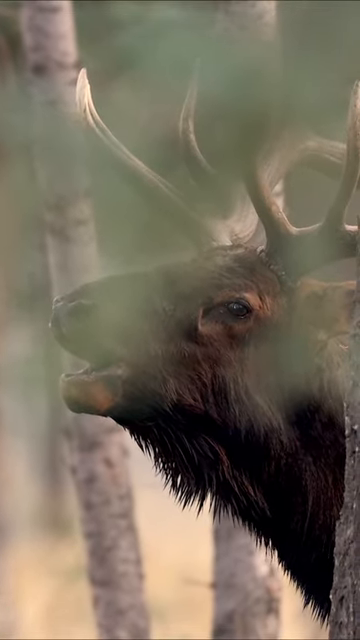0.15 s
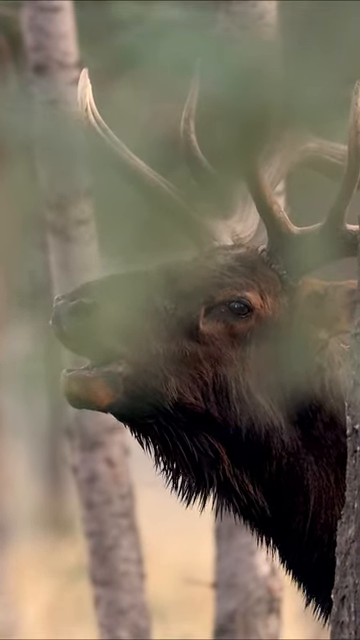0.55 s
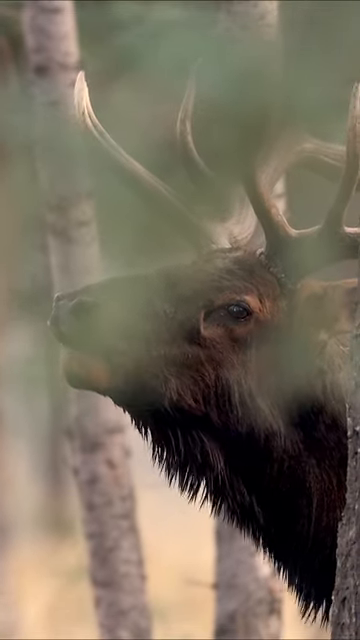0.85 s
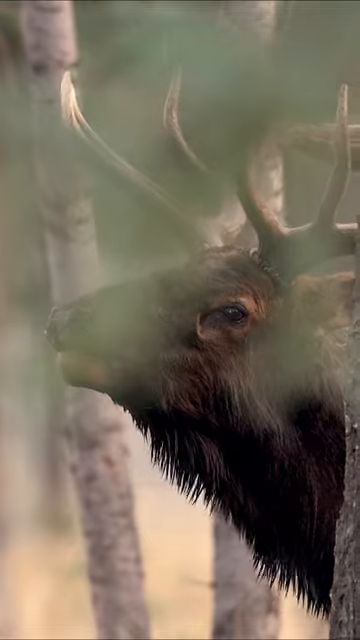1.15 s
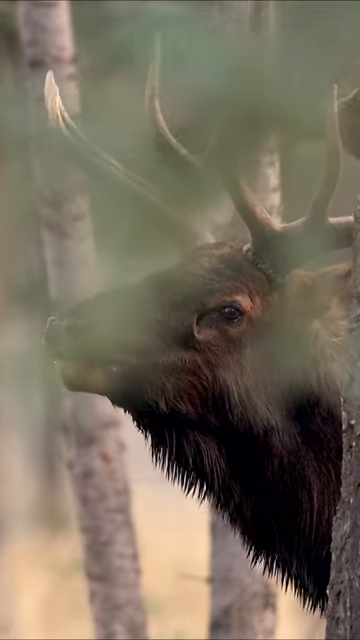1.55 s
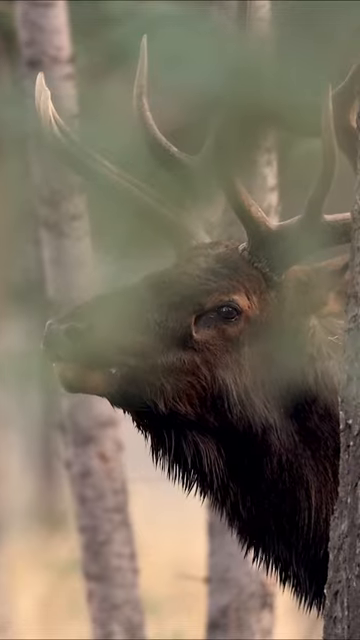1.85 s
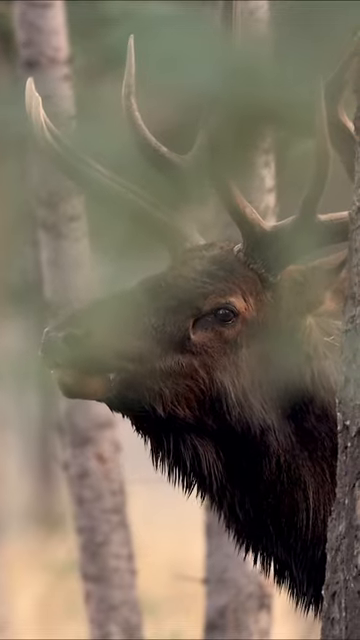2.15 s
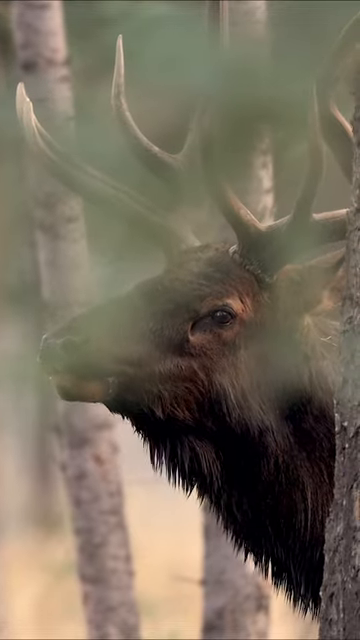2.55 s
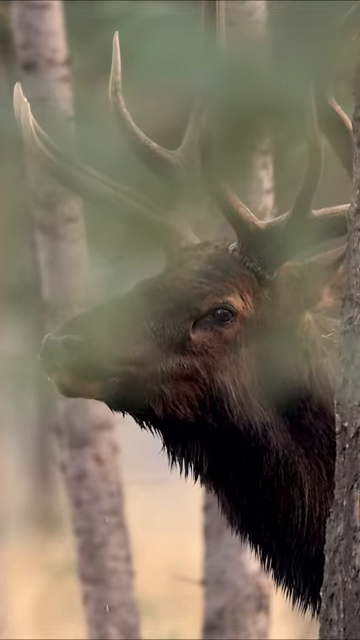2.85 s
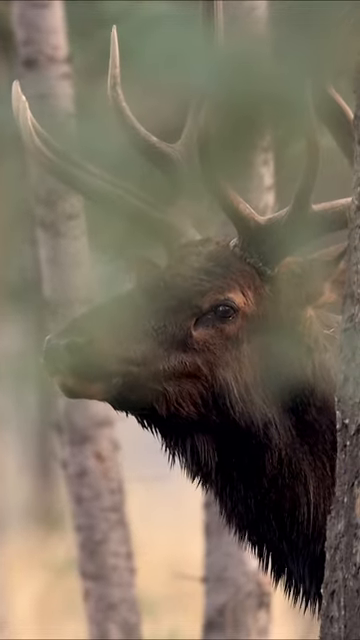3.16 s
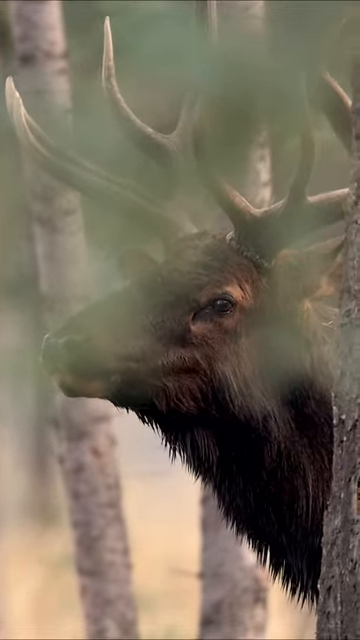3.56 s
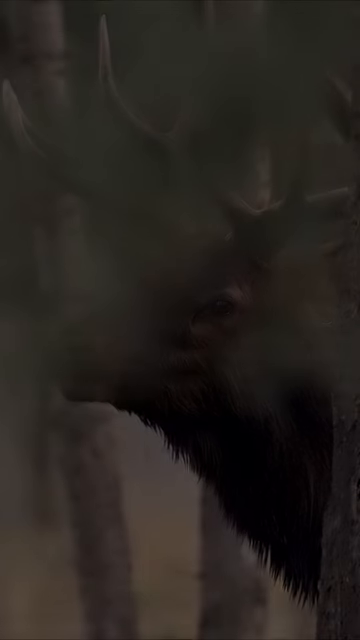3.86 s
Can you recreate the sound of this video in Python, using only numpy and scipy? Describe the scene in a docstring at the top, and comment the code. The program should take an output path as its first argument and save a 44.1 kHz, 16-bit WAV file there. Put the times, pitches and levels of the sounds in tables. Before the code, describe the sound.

Tail of an elk bugle falls fast from shrill whistle to low, with a rough throb, then echoes fade over soft wind. Later a much quieter, farther elk whistles up and breaks into a raspy, pulsing scream outdoors.

```python
"""Two bull elk bugling

A near bull ends its bugle: an air-jet whistle falls, its vocal folds drone, throb it and rasp underneath.
A farther bull answers: its whistle climbs in steps, then fold pulses ring its throat in a rough scream.
Trunks and valley echo the calls, over filtered-noise wind, wavering low tones and microphone hiss."""
import sys
import numpy as np
from scipy import signal
from scipy.fft import rfft, irfft
from scipy.io import wavfile
from scipy.ndimage import uniform_filter1d

SR = 44100
rng = np.random.default_rng(int(sys.argv[2]) if len(sys.argv) > 2 else 0)


def gain_from_decibels(decibels):
    """Convert decibel values to linear amplitude factors."""
    exponent = np.asarray(decibels, float) / 20
    return 10 ** exponent


def dump(signal):
    """Clip the signal to [-1, 1] and save it as 16-bit WAV at the path in sys.argv[1]."""
    limited = np.clip(np.atleast_2d(signal).T, -1, 1)
    pcm = np.round(limited * 32767).astype(np.int16)
    wavfile.write(sys.argv[1], SR, pcm)


N = 176400

# Near bull's whistle: (time [s], whistle pitch [Hz], whistle level [dB], lower sideband [dB],
# upper sideband [dB], octave [dB]); the last three are relative to the whistle
NEAR_WHISTLE = [(0, 1660, -34, -8, -1, -35), (.022, 1580, -35, -10, 3, -35),
                (.045, 1480, -52, -10, 11, -35), (.06, 1370, -44, -1, -4, -30),
                (.08, 1285, -36, -2, -10, -40), (.1, 1212, -31, -6, -13, -32),
                (.14, 1163, -29, -7, -15, -24), (.16, 1118, -27, -3, -19, -23),
                (.18, 1060, -27, -3, -16, -30), (.2, 1021, -26, -6, -15, -38),
                (.24, 970, -22, -7, -21, -36), (.26, 945, -21, -17, -24, -32),
                (.28, 865, -20, -22, -30, -28), (.299, 835, -18, -25, -30, -35),
                (.305, 790, -30, -25, -30, -35), (.326, 650, -30, -14, -20, -22),
                (.345, 615, -29, -12, -20, -26), (.349, 440, -41, -30, -30, -25),
                (.368, 200, -43, -30, -30, -25), (.378, 150, -75, -30, -30, -25)]
# Near bull's vocal folds: (time [s], pitch [Hz], first partial level [dB], second partial level [dB])
NEAR_FOLDS = [(0, 155.5, -27.5, -39), (.08, 144.2, -32.5, -54), (.14, 143.2, -34, -46),
              (.18, 138.3, -47, -40), (.24, 134.5, -42.5, -37), (.27, 132, -63, -36), (.3, 133, -59, -52),
              (.33, 131, -53.5, -78.5)]
# Far bull's whistle: (time [s], whistle pitch [Hz], whistle level [dB], lower sideband [dB],
# upper sideband [dB], octave [dB]); the last three are relative to the whistle
FAR_WHISTLE = [(2.66, 851, -79, -59, -22, -2), (2.71, 882, -56.5, -25, -46, -20),
               (2.765, 970, -54, -44, -32, -26), (2.79, 1050, -74, -29, -49, -22),
               (2.822, 1440, -57, -40, -40, -25), (2.847, 1480, -52, -40, -40, -25),
               (2.853, 1740, -56, -40, -40, -30), (2.885, 1795, -49, -40, -40, -35),
               (2.895, 1960, -74, -40, -40, -12), (2.916, 2010, -62, -40, -40, -8),
               (2.942, 2046, -55, -40, -40, -19), (2.975, 2036, -53, -40, -40, -21),
               (3.0, 2028, -52, -40, -40, -13), (3.05, 2042, -51, -40, -30, -8),
               (3.07, 2048, -59, -20, -25, -8), (3.085, 2045, -60, -6, -12, -11),
               (3.102, 2028, -61, -6, -5, 0), (3.13, 2023, -62, -6, -4, 4), (3.166, 2021, -62, -6, -6, 0),
               (3.182, 2022, -64, -6, -8, -9), (3.215, 2020, -60, -3, -15, -3),
               (3.27, 2022, -67, -3, -15, -6), (3.45, 2010, -74, -6, -13, -4)]
# Far bull's scream: (time [s], fold pulse rate [Hz], level [dB], deep resonances [dB],
# upper resonances [dB], top resonances [dB]); the last three are relative to the main resonances
FAR_SCREAM = [(3.16, 93, -57, -27, -5, -35), (3.178, 92.3, -39.5, -19, -14.5, -30),
              (3.23, 92, -38, -25, -13, -31), (3.255, 92, -40.5, -34, -12, -38),
              (3.28, 91.25, -38, -30, -6, -35.5), (3.35, 84.98, -36, -33, -11.5, -33.5),
              (3.5, 84, -36.5, -22, -11, -36), (3.55, 83.82, -42.5, -33, -4, -25.5),
              (3.61, 84.63, -37.5, -29, -7.5, -32), (3.69, 87.07, -41, -23, -2.5, -27),
              (3.74, 88.26, -48, -6, 5, -23), (3.79, 88.5, -42.5, -13, -6, -27.5),
              (3.88, 91.7, -45.5, -2.5, -1, -24), (4, 93.45, -43, -22, -3, -27)]
# Near bull's rough voice: (time [s], fold pulse rate [Hz], level [dB], deep resonances [dB],
# upper resonances [dB], top resonances [dB]); the last three are relative to the main resonances
NEAR_SCREAM = [(0, 150.7, -32.5, -8, -4, -36), (.06, 149.6, -42, -0.5, -10, -30),
               (.12, 146.6, -51.5, 4.5, 7.5, -23), (.25, 134, -57, 9.5, 0.5, -17.5),
               (.33, 130.5, -57, 8, 2, -22.5), (.37, 136.3, -82, 1.5, 8, -12)]
# Resonances of the long throat and nose, in four groups (deep, main, upper, top):
# (centre [Hz], width [Hz], level within the group [dB])
THROAT = [
    [(260, 44, -2), (491, 39, -3), (625, 180, -5), (882, 150, -4.5)],
    [(1417, 25, -9), (1700, 74, -0.5), (1767.4, 48, -2.5)],
    [(1907, 36, -9.5), (2093, 84, 1), (2257, 65, -6.5), (2315, 87, -6)],
    [(3203, 150, 2.5), (3680, 440, -2.5), (6270, 950, -19)],
]
# Colour of wind and hiss: (frequency [Hz], relative level per Hz [dB])
WIND_COLOUR = [(15, -57), (30, -31.5), (54, -14.5), (80, -8.5), (130, -16), (160, -11.5), (270, -16),
               (400, -18), (900, -21.5), (1300, -27.5), (2000, -37), (2500, -41.5), (4000, -45.5),
               (5000, -54.5), (6300, -56), (16000, -57.5)]
# Low drone: (time [s], pitch [Hz], level [dB])
DRONE = [(0.4, 104.2, -63), (0.49, 103, -48), (0.88, 103.7, -49), (1.18, 96.03, -51), (1.64, 91.15, -48),
         (3.02, 90.7, -51), (3.271, 86, -67), (3.41, 81.3, -46.5), (3.49, 84.3, -55), (3.901, 83, -54),
         (4.0, 95, -55)]
# Tones above the drone that waver around a fixed pitch: (pitch [Hz], level [dB])
DRONE_MATES = [(127, -56.5), (275, -63.5)]

FAR_THROB_HZ = 198
OCTAVE_THROB_DB = -8  # sidebands of the octave, relative to those of the whistle
PULSE_JITTER, PULSE_SCATTER_DB = .015, 2.6  # spread of pulse rate (fraction) and of pulse size
RASP_DB = -6  # raspy air, relative to the pulses
SQUEAL_HZ, SQUEAL_THROB = 1735, .72  # pitch and full throb depth (fraction)
SQUEAL_RISE_S = .09  # the squeal starts smooth; its throb is full after this long
NEAR_SQUEAL_DB, FAR_SQUEAL_DB = -16.5, 5.5  # relative to the main resonances
TRUNK_S, TRUNK_DB = .048, -10  # delay and level of the single echo
TRUNK_HZ, TRUNK_WIDTH_HZ = 1100, 500  # band that a trunk throws back
WOOD_T60_S, WOOD_DB = .3, -15.5  # short tail: time to fall by 60 dB, total energy
VALLEY_T60_S, VALLEY_DB = 3.9, -30  # long tail, same settings
AFTER_HZ, AFTER_WIDTH_HZ = 2960, 1100
AFTER_DB, AFTER_T60_S = -65, 7.5  # level at the start, time to fall by 60 dB
WIND_DB = -47
GUST_DB, FLICKER_DB = 1.21, 1.05  # spread of the shared swell and of each octave's own flicker
GUST_TOP_OCTAVE = 11  # octaves centred above 2 ** 11 Hz stay steady
DRONE_WANDER_HZ = 2


def cols(table):
    """Columns of a curve table at every sample, and a mask of where it sounds."""
    t, points = np.arange(N) / SR, np.array(table, float)
    curves = [np.interp(t, points[:, 0], column) for column in points.T[1:]]
    return curves, (t >= points[0, 0]) & (t <= points[-1, 0])


def unit(x):
    """Scale to rms 1."""
    return x / np.sqrt(np.mean(x ** 2))


def walk(rate):
    """Smooth random wander with spread 1, taking `rate` steps per second."""
    k = max(int(SR / rate), 1)
    steps = np.repeat(rng.standard_normal(N // k + 1), k)
    smooth = uniform_filter1d(uniform_filter1d(steps, k), k)
    return unit(smooth[:N])


def turn(hz):
    """Running phase [radians] of a moving frequency."""
    return 2 * np.pi * np.cumsum(hz) / SR


def ring(x, hz, width_hz):
    """A resonance applied three times: steep flanks, soft rise."""
    b, a = signal.iirpeak(hz, hz / (width_hz * 2), SR)
    return signal.sosfilt(np.tile(np.r_[b, a], (3, 1)), x)


def folds(table):
    """The low drone of the vocal folds: two clean partials."""
    (hz, first_db, second_db), on = cols(table)
    phase = turn(hz)
    partials = gain_from_decibels(first_db) * np.sin(phase) + gain_from_decibels(second_db) * np.sin(2 * phase)
    return np.sqrt(2) * on * partials


def whistle(table, throb_hz):
    """Air jet tone and its octave, each with sidebands from the throbbing folds."""
    (hz, db, low_db, up_db, octave_db), on = cols(table)
    jet = turn(hz * (1 + 0.0039 * walk(60)))
    fold = turn(throb_hz * (1 + 0.024 * walk(37)))
    side = gain_from_decibels(low_db) * np.exp(-1j * fold) + gain_from_decibels(up_db) * np.exp(1j * fold)
    tone = np.exp(1j * jet) * (1 + side)
    octave = np.exp(2j * jet) * (1 + gain_from_decibels(OCTAVE_THROB_DB) * side)
    tone = tone + gain_from_decibels(octave_db + 2.1 * walk(25)) * octave
    return np.sqrt(2) * on * gain_from_decibels(db + 1.0 * walk(70)) * tone.imag


def scream(table, squeal_db):
    """Uneven fold pulses and puffs of raspy air ring the throat; a held squeal throbs with the pulses."""
    (rate, db, deep_db, upper_db, top_db), on = cols(table)
    cycle = turn(rate * (1 + PULSE_JITTER * walk(70))) / (2 * np.pi)
    # One random size for each whole cycle, and one click at its start
    size = gain_from_decibels(PULSE_SCATTER_DB * rng.standard_normal(N // 50))[cycle.astype(int)]
    pulses = np.diff(np.floor(cycle), prepend=0) * size
    air = unit((0.87 + np.sin(np.pi * cycle) ** 2) * rng.standard_normal(N))
    source = unit(pulses) + gain_from_decibels(RASP_DB) * air

    # The upper and top groups get extra air
    sources = (source, source, source + gain_from_decibels(7.0) * air, source + air)
    groups = []
    for sound, group in zip(sources, THROAT):
        rung = sum(gain_from_decibels(part_db) * ring(sound, hz, width) for hz, width, part_db in group)
        groups.append(unit(rung))
    deep, main, upper, top = groups

    since_start = np.arange(N) / SR - table[0][0]
    depth = SQUEAL_THROB * np.clip(since_start / SQUEAL_RISE_S, 0, 1) ** 2
    throb = 1 - depth * np.cos(2 * np.pi * cycle)
    squeal = np.sin(turn(SQUEAL_HZ * (1 + .009 * walk(30))))
    squeal = uniform_filter1d(size, SR // 300) * throb * squeal
    main = unit(main + gain_from_decibels(squeal_db) * unit(squeal))
    return on * gain_from_decibels(db) * (main + gain_from_decibels(deep_db) * deep + gain_from_decibels(upper_db) * upper + gain_from_decibels(top_db) * top)


def echo_tail(t60_s, db):
    """Scattered echoes as noise that rises softly, then dies away."""
    t = np.arange(2 * SR) / SR
    fade = gain_from_decibels(-60 * t / t60_s) * (1 - np.exp(-(t / .028) ** 2))
    noise = unit(rng.standard_normal(len(t)) * fade)
    return gain_from_decibels(db) * noise / np.sqrt(len(t))


def woods(x):
    """Adds a trunk echo, a short scattered tail and a faint long one from the valley."""
    click = 1. * (np.arange(2 * SR) == int(TRUNK_S * SR))
    echoes = echo_tail(WOOD_T60_S, WOOD_DB) + echo_tail(VALLEY_T60_S, VALLEY_DB)
    echoes = echoes + gain_from_decibels(TRUNK_DB) * ring(click, TRUNK_HZ, TRUNK_WIDTH_HZ)
    return x + signal.fftconvolve(x, echoes)[:N]


def afterglow():
    """Fading band of noise: treble of the long bugle that the valley still returns."""
    fade = gain_from_decibels(AFTER_DB - 60 * np.arange(N) / SR / AFTER_T60_S)
    return fade * unit(ring(rng.standard_normal(N), AFTER_HZ, AFTER_WIDTH_HZ))


def wind():
    """Coloured noise: octaves swell together and flicker alone; the top ones are steady microphone hiss."""
    log_hz = np.log(np.maximum(np.arange(N // 2 + 1) * SR / N, 1))
    colour = np.array(WIND_COLOUR, float)
    colour_db = np.interp(log_hz, np.log(colour[:, 0]), colour[:, 1])
    spectrum = rfft(rng.standard_normal(N)) * gain_from_decibels(colour_db)
    gust, out = walk(0.72), 0
    for octave in range(4, 16):
        # Neighbouring octaves crossfade into each other
        share = np.clip(1 - abs(log_hz / np.log(2) - octave), 0, 1)
        swell_db = (octave <= GUST_TOP_OCTAVE) * (GUST_DB * gust + FLICKER_DB * walk(8.1))
        out = out + irfft(spectrum * share, N) * gain_from_decibels(swell_db)
    return gain_from_decibels(WIND_DB) * unit(out)


def wavering_tone(hz, db):
    """A sine whose pitch and level wander at random."""
    phase = turn(hz + DRONE_WANDER_HZ * walk(13))
    return np.sqrt(2) * gain_from_decibels(db + 1.5 * walk(6.8)) * np.sin(phase)


def drone():
    """A low distant hum whose pitch and level move, with two more wavering tones above it."""
    (hz, db), _ = cols(DRONE)  # the end values hold outside the table's times
    return wavering_tone(hz, db) + sum(wavering_tone(f, mate_db) for f, mate_db in DRONE_MATES)


def scene():
    """Both bulls in the wood over wind and drone; the deep fold tones get no echo."""
    fold_hz = cols(NEAR_FOLDS)[0][0]
    near = whistle(NEAR_WHISTLE, fold_hz) + scream(NEAR_SCREAM, NEAR_SQUEAL_DB)
    far = whistle(FAR_WHISTLE, FAR_THROB_HZ) + scream(FAR_SCREAM, FAR_SQUEAL_DB)
    mix = folds(NEAR_FOLDS) + woods(near) + woods(far) + afterglow() + wind() + drone()
    return mix[None]


def band_limit(x):
    """A steep low-pass at the top of the band."""
    return signal.sosfilt(signal.butter(12, 15750, fs=SR, output="sos"), x)


def record(dry):
    """Turns the finished mix into the final sound."""
    return band_limit(dry)


dry = scene()
out = record(dry)
dump(out)
```